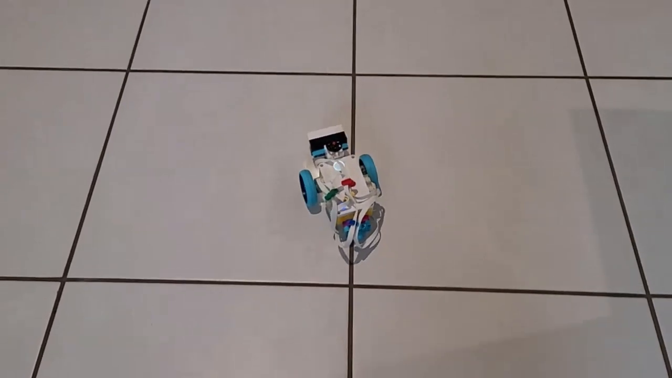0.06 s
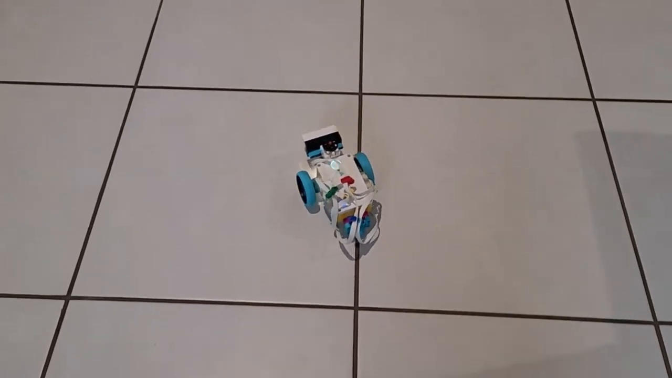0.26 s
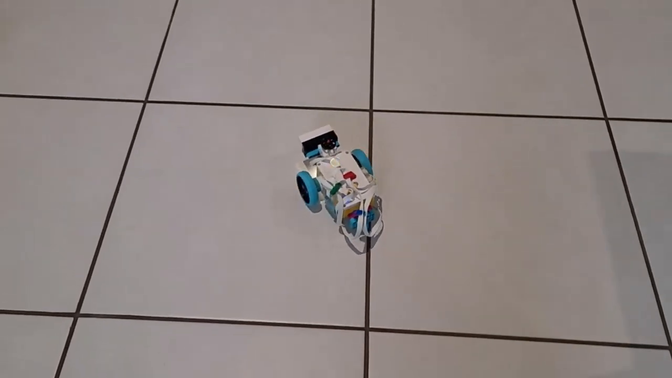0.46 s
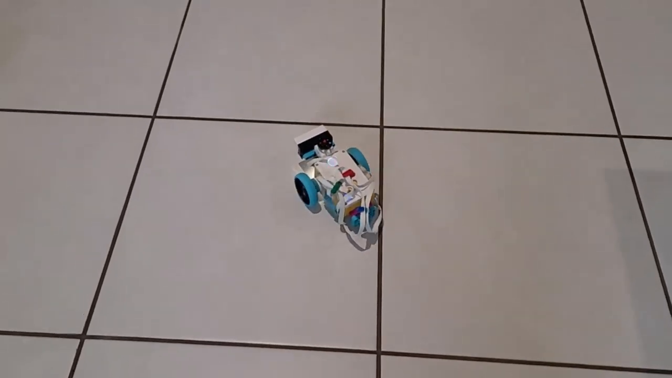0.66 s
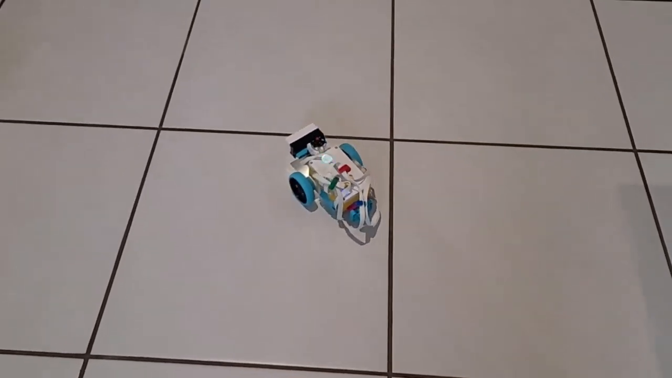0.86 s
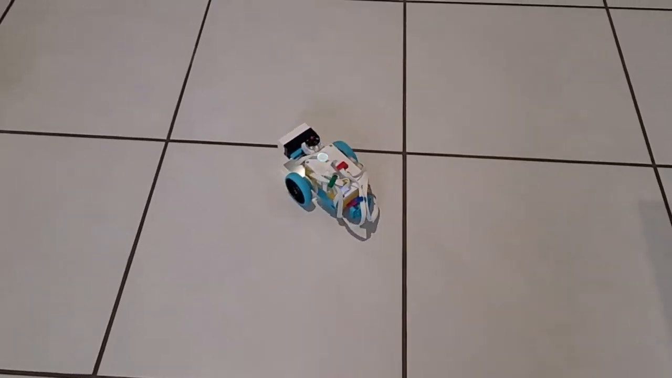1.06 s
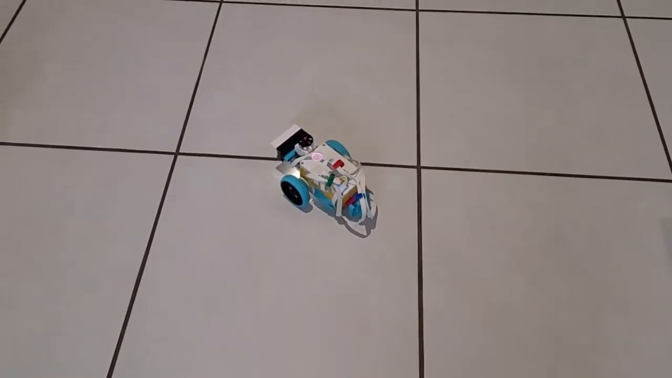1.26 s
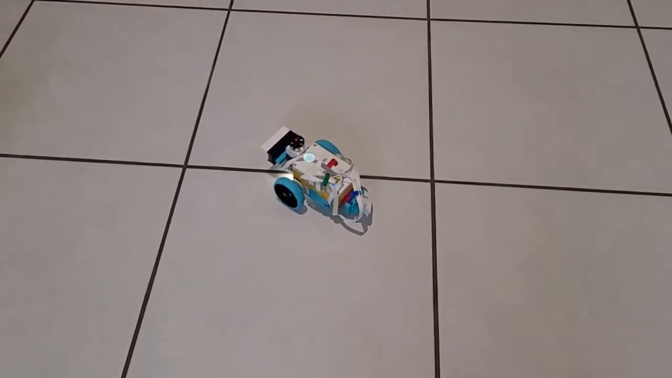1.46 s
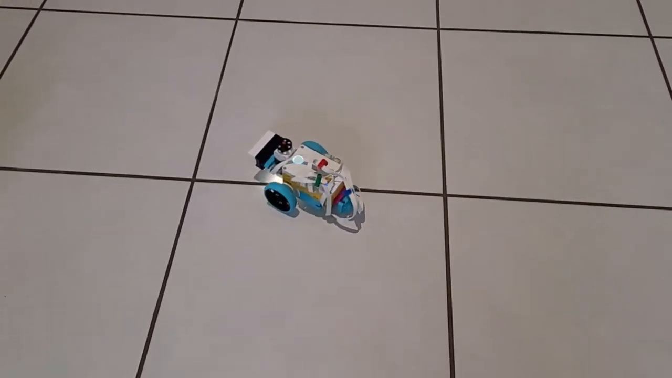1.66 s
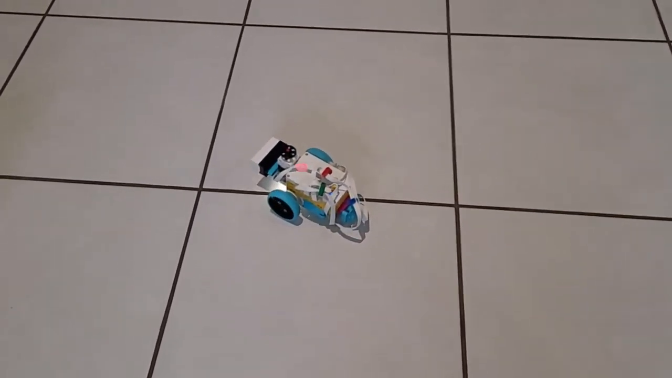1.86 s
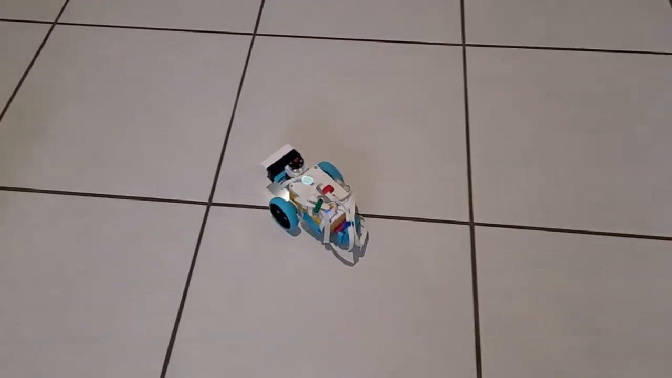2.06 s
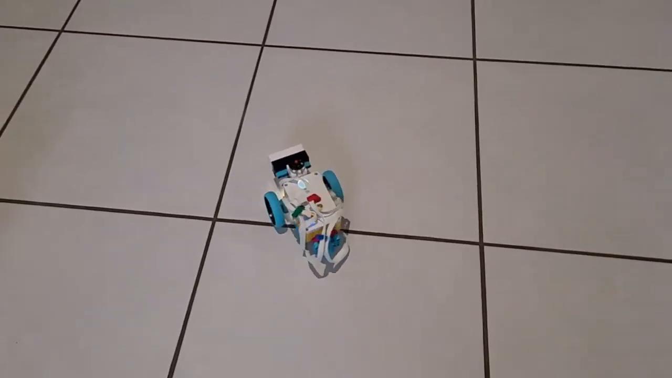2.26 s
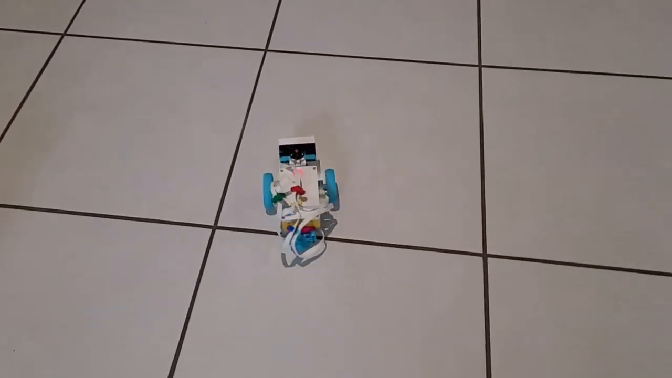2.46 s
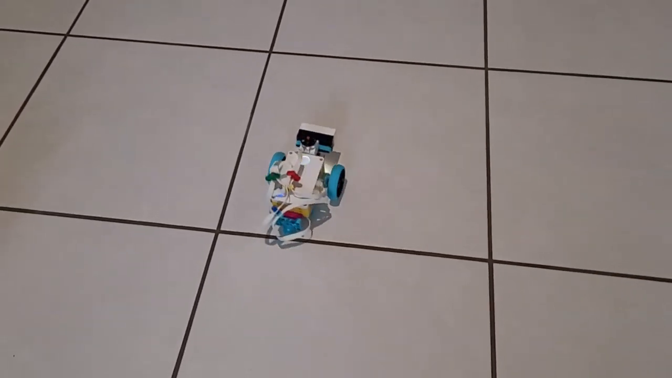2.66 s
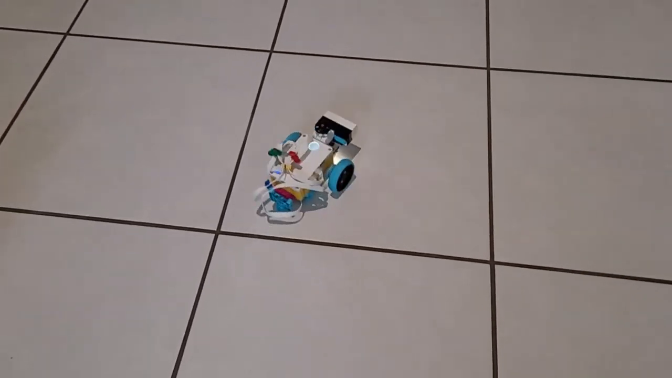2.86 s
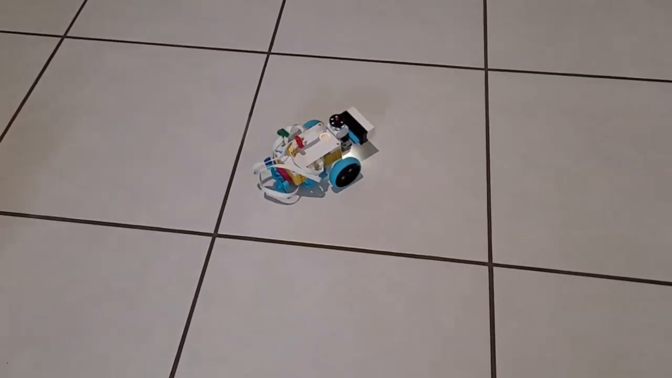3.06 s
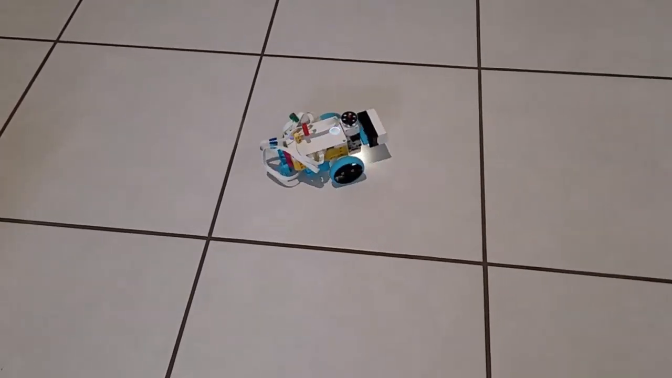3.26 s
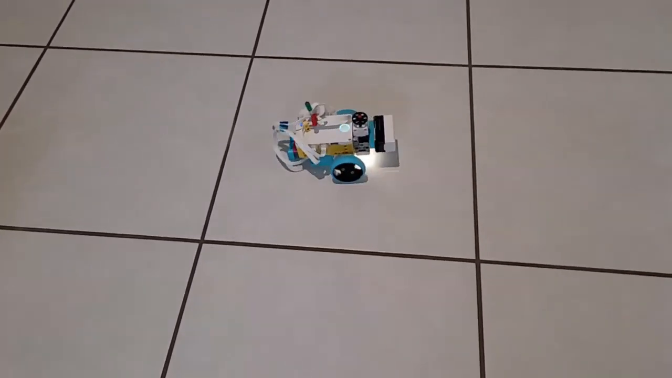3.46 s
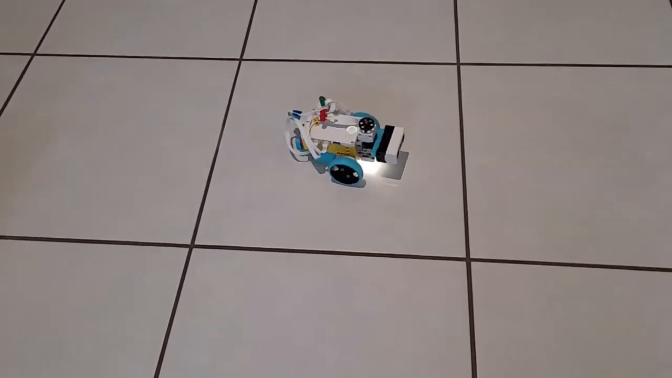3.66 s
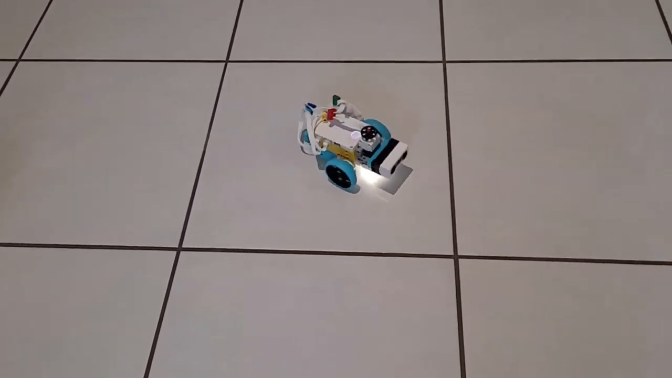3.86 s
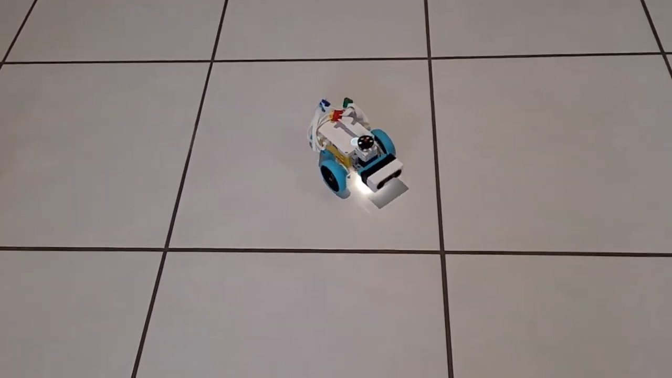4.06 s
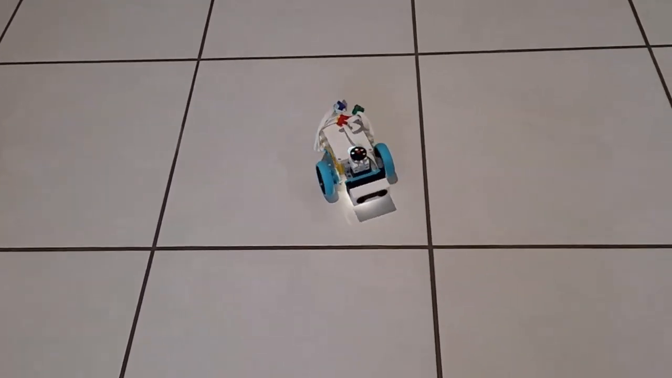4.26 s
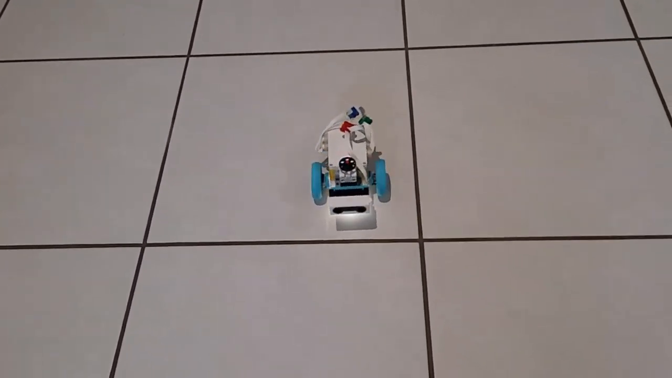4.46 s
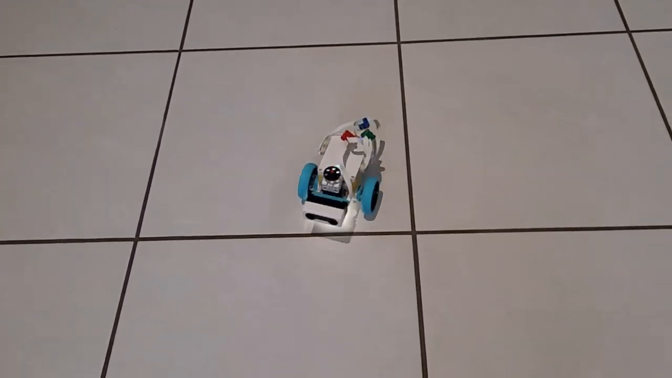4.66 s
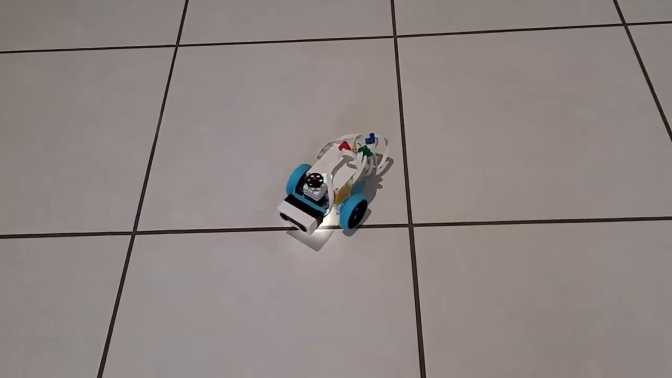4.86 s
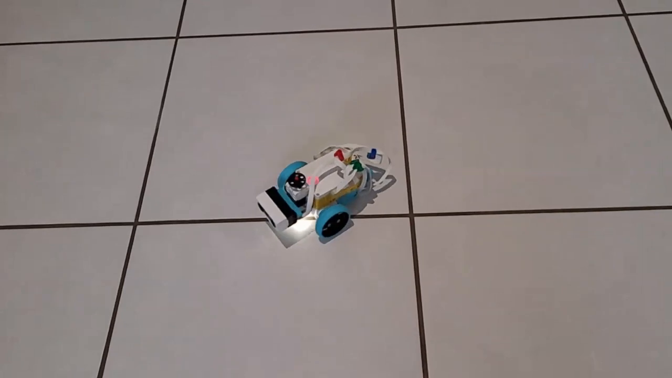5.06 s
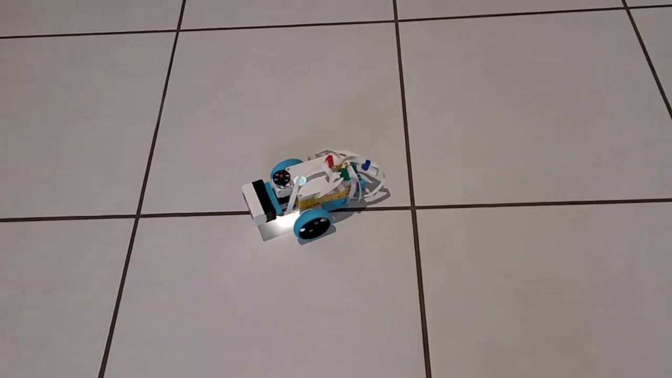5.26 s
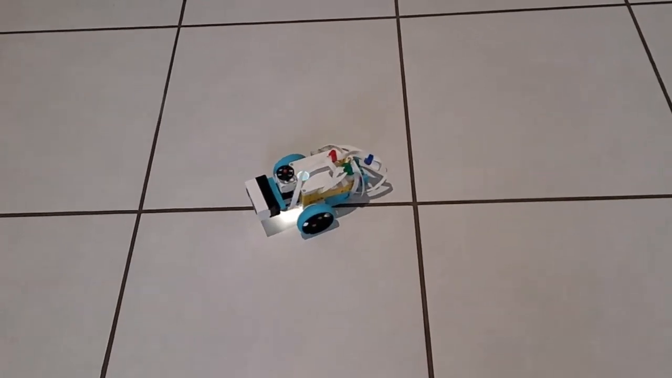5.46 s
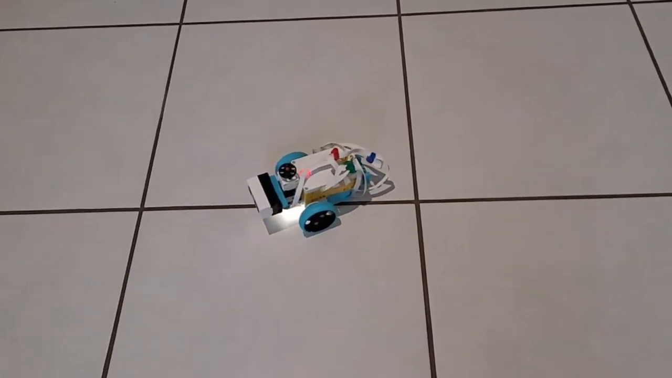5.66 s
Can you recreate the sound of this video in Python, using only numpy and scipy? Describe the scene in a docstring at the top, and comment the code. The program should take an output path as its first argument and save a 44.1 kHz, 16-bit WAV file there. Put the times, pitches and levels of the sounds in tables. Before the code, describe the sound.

Small electric motors whirr, their plastic gears rattling over a thin, steady whine, as a toy robot rolls on tile. The whirr breaks off briefly with one sharp click, resumes for a longer stretch with a quick clatter at a joint, and ends in a lighter click. The bare room rings a little around it. Two dull, dry bumps sound right at the microphone at the end.

```python
"""A whirring, rattling toy robot drives over a tiled floor in a hard, ringing room.
Two small geared motors rattle their teeth in plastic housings, brushes fizz, and the pulsed supply
whines. The robot brakes with a sharp click of gear slack, sets off in a turn, jolts over a joint
and stops. Two soft bumps follow at the microphone, over a faint rumble and hiss."""
import sys
import numpy as np
from scipy import signal
from scipy.fft import rfft, irfft
from scipy.io import wavfile

SR = 44100
rng = np.random.default_rng(int(sys.argv[2]) if len(sys.argv) > 2 else 0)


def waveform_to_disk(signal):
    """Save audio, clipped to [-1, 1], as 16-bit WAV at the path in sys.argv[1]."""
    frames = np.transpose(np.atleast_2d(signal))
    scaled = np.clip(frames, -1, 1) * 32767
    samples = np.round(scaled).astype(np.int16)
    wavfile.write(sys.argv[1], SR, samples)


N = 251811
T = np.arange(N) / SR
SPIN_UP_S, BRAKE_S = .2, .125
SUPPLY_HZ = 1200

# The straight run, then the turn, with the balance of the parts:
# on_s, off_s, gear_db, chassis_db, fizz_db, roll_db, whine_db, whine_swell_db_per_s
RUNS = [(-.3, 1.68, -41.9, -47.5, -43, -62, -57, -4.5), (1.87, 5.191, -42, -48.4, -43.3, -64.5, -56.7, 4.1)]
# How hard the motors work: time_s, effort_db
EFFORT = [(0.03, -41), (0.074, -41), (1.66, -41), (2.1, -42), (2.5, -39), (2.81, -43), (3.37, -45),
          (4.53, -45), (5.15, -41), (5.19, -42)]
# Tone of the gearbox, the chassis, and the tyres and caster on tile: frequency_hz, density_db
GEARBOX_TONE = [(900, -39.5), (1550, -14.5), (1820, -9.5), (1920, -7), (2200, -3), (2480, -0.5), (2700, 2),
                (2920, -1), (3150, -8.5), (3450, -19), (4200, -19), (4850, -15), (5250, -30.5),
                (9000, -28.5)]
CHASSIS_TONE = [(120, -39), (270, -29), (400, -32), (560, -28), (850, -23), (980, -2), (1200, 4),
                (1340, 3.5), (1480, -9), (1900, -28.5)]
ROLLING_TONE = [(100, -10.5), (280, -3.5), (420, -7), (600, -6), (720, 3.5), (900, 2), (1500, -9.5),
                (3000, -44)]
# Tone of the brush fizz, driving straight and turning: frequency_hz, density_db
FIZZ_STRAIGHT = [(2120, -44.5), (3600, -8.5), (4140, -10), (4710, -5.5), (5290, -7), (6090, -1),
                 (7630, -11.5), (8260, -6.5), (8940, -13), (9980, -7.5), (10500, -3), (11000, 1.5),
                 (12300, -5), (13800, -15.5), (15500, -22)]
FIZZ_TURNING = [(2120, -41.5), (3600, -8), (4300, -9.5), (4740, -8), (5350, -5), (6200, 1.5), (6920, -5),
                (9050, -11), (11500, -0.5), (12700, -4.5), (15500, -33)]
# Resonances that come and go: peak_s, half_length_s, pitch_hz, glide_hz_per_s, relative_db
RESONANCES = [(.45, .7, 2800, -80, -49), (2.342, .13, 2750, -100, -45), (2.76, .21, 2783, -300, -41),
              (3.8, .5, 2660, -50, -56.5), (4.65, .6, 4810, 30, -54.5), (4.85, .6, 2150, -50, -50),
              (4.8, .6, 1930, -30, -55)]
# First three harmonics of the supply pulses: pitch_hz, relative_db
WHINE_HARMONICS = [(SUPPLY_HZ, -4), (2 * SUPPLY_HZ, 0), (3 * SUPPLY_HZ, -18)]
# Gear slack snapping shut: start_s, level_db, brightness_db, pitch_factor, damping_factor
SNAPS = [(1.8089, -19, -12, 0.95, 1.2), (1.8104, -7.5, -23, 1.005, 1.4), (1.8115, -15.5, 3, 1.0031, 1.6),
         (1.8148, -26, 4, 1.04, 1.6), (5.3203, -22.5, -22, 1.02, 2.1), (5.3362, -45, 3, 1.047, 1.5)]
# Modes of the plastic frame, which each snap scales: base_pitch_hz, relative_db, base_t60_s
FRAME_MODES = [(1330, -20, 0.026), (2791, 2, 0.01197), (2928, -3, 0.032), (3150, -20.5, 0.04013),
               (4080, -14, 0.018837), (4740, -3.5, 0.024), (5560, -12, 0.018), (8182, -15.5, 0.02),
               (11400, -12.5, 0.014), (12157, -13, 0.018)]
# Tone of a snap's crack: frequency_hz, density_db
CRACK_TONE = [(250, -25.5), (700, -3.5), (1350, 6), (2150, -7), (3050, 6.5), (3550, 2), (4200, 7),
              (4700, 6.5), (5050, -5), (5800, 6), (6600, -3), (9300, -12.5), (12200, -9), (13000, -30),
              (15500, -29)]
# Wheels jolting on the tiles and the chassis rocking at each stop: start_s, rattle_db, thump_db
JOLTS = [(.31, -44, -45), (1.181, -38, -51), (1.33, -39, -55), (1.622, -39, -43), (1.655, -42, -44),
         (1.811, -32, -50), (2.09, -39, -47), (2.639, -33.5, -55), (2.6488, -27, -52), (2.657, -28, -52),
         (2.751, -39, -55), (2.814, -35.5, -59), (4.295, -40, -57), (5.334, -42.5, -54)]
# Soft bumps at the microphone: start_s, knock_db, knock_pitch_hz, thud_db
BUMPS = [(5.4917, -38.5, 300, -79.5), (5.5145, -36, 377, -47.5)]
# Ring time of the room: frequency_hz, t60_s
ROOM_DECAY = [(200, 0.54), (1000, 0.65), (3000, 0.73), (6000, 0.84), (9000, 0.56), (14000, 0.64)]
# Early echoes off floor and walls: nominal_delay_s, gain
ECHOES = [(.0032, 0.35), (0.0118, 0.19), (0.0177, 0.0865), (0.0216, 0.15), (0.031, .12), (.047, 0.14)]
# Tone of the room's rumble and hiss: frequency_hz, density_db
RUMBLE_TONE = [(15, -46.5), (27, -22), (34, -9), (47, 3), (65, -3), (105, -3), (170, -16), (260, -11),
               (500, -38)]
HISS_TONE = [(150, -17), (400, -3), (1000, -11), (4000, -31), (15000, -25.5)]


def motors(gear_rub=.45, fizz_rub=.97, settle_db_per_s=.84):
    """Gear teeth ring the gearbox and chassis; brushes add a fine fizz and the wheels a low roll."""
    fast, slow = gear_teeth(per_turn=3), gear_teeth(per_turn=2)
    gearbox = unit(colour(fast + gear_rub * friction(), GEARBOX_TONE))
    chassis = unit(colour(slow + .5 * fast + gear_rub * friction(), CHASSIS_TONE))
    rolling = unit(colour(friction(), ROLLING_TONE))
    brushes = gear_teeth(per_turn=6) + .5 * fast + fizz_rub * friction()
    out = np.zeros(N)
    for run, fizz_tone in zip(RUNS, (FIZZ_STRAIGHT, FIZZ_TURNING)):
        on, off, gear_db, chassis_db, fizz_db, roll_db, *_ = run
        spinning = spin(on, off)
        settling = amp(-settle_db_per_s * (T - on))  # rattle and roll calm down as a run goes on
        fizz = unit(colour(brushes, fizz_tone))
        out += settling * part_gain(gear_db, spinning, per_effort=.6, power=.9) * gearbox
        out += settling * part_gain(chassis_db, spinning, per_effort=.25, power=1) * chassis
        out += settling * part_gain(roll_db, spinning, per_effort=1.7, power=1.5) * rolling
        out += part_gain(fizz_db, spinning, per_effort=.86, power=2.04) * fizz
    return out + resonances(fast)


def gear_teeth(per_turn, uneven_db=2, drift=.012, jitter=.04, lope_db=1):
    """Tooth impacts of two gear trains at different speeds; strong and weak teeth recur each turn."""
    out = np.zeros(N)
    for ratio in (1, .76):
        speed = ratio * shaft_speed() * (1 + drift * wander(6) + jitter * wander(300))
        tooth = np.floor(np.cumsum(speed) * per_turn / SR).astype(int)
        hits = np.flatnonzero(np.diff(tooth) > 0)
        wear = rng.standard_normal(per_turn)[tooth[hits] % per_turn]
        strength = amp(uneven_db * (rng.standard_normal(N)[hits] + .5 * wear))
        out[hits] += strength * rng.choice([-1, 1], N)[hits]
    return unit(out * amp(lope_db * wander(30)))


def friction(flutter_db=2):
    """Sliding noise, fluttering as the shafts turn."""
    return unit(rng.standard_normal(N) * amp(flutter_db * wander(140)))


def resonances(teeth, trim_db=-2, width_hz=130, waver=.004):
    """Narrow bands of the gear noise sing out and fade as the robot swings round."""
    out = np.zeros(N)
    for peak, half, centre_hz, glide, db in RESONANCES:
        hz = centre_hz + glide * np.clip(T - peak, -2 * half, 2 * half)
        hz *= 1 + waver * wander(7.1)
        swell = running() * np.exp(-((T - peak) / half) ** 2)
        ring = resonate(teeth + friction(), hz, width_hz)
        out += swell * amp(db + trim_db) * unit(resonate(ring, hz, width_hz))
    return out


def effort(usual_db=-42):
    """Motor effort in dB above the usual."""
    return np.interp(T, *np.transpose(EFFORT)) - usual_db


def spin(on, off):
    """Rises from 0 to 1 as the motors spin up, and falls back as they brake."""
    return np.clip((T - on) / SPIN_UP_S, 0, 1) * np.clip(1 - (T - off) / BRAKE_S, 0, 1)


def running():
    """The spin over both runs."""
    return sum(spin(on, off) for on, off, *_ in RUNS)


def shaft_speed(usual_hz=116, hz_per_effort_db=1.79, crawl=.3):
    """Turns per second, climbing from a crawl with spin and rising with effort."""
    return (usual_hz + hz_per_effort_db * effort()) * (crawl + (1 - crawl) * running())


def part_gain(db, spinning, per_effort, power):
    """A moving part gets louder with effort and with a power of the spin."""
    return amp(db + per_effort * effort()) * spinning ** power


def supply_whine(waver_db=1.5, ripple=.15, ripple_hz=52, octave_lead=.6, hold_s=.06, fade_db_per_s=260.5):
    """Supply pulses make the windings sing until just past switch-off; the rotor ripples the level."""
    rotor_hz = ripple_hz * (1 + .053 * wander(4))
    rotor = 1 + ripple * np.cos(2 * np.pi * np.cumsum(rotor_hz) / SR)
    root, octave, twelfth = [
        amp(db + waver_db * wander(7.2)) * np.sin(2 * np.pi * hz * T + .5 * wander(7.1))
        for hz, db in WHINE_HARMONICS]
    out = np.zeros(N)
    for on, off, *_, db, swell in RUNS:
        attack = np.clip((T - on) / SPIN_UP_S, 0, 1)
        load_db = swell * (np.clip(T, on, off) - on)
        fade_db = fade_db_per_s * np.maximum(T - off - hold_s, 0)
        lead = amp(octave_lead * (load_db - swell * (off - on) / 2))  # the octave swells and sinks most
        out += attack * amp(db + load_db - fade_db) * (octave + (root + twelfth) / lead)
    return rotor * out


def gear_snaps(rise_s=.0008, crack_db=-3, crack_decay_s=.0021, rattle_db=-21.5, rattle_decay_s=.066):
    """Gear slack snaps shut: it cracks, rings the frame and leaves loose parts chattering."""
    out, t = np.zeros(N), T[:SR // 3]
    contact = amp(crack_db) * np.exp(-t / crack_decay_s) + amp(rattle_db) * np.exp(-t / rattle_decay_s)
    attack = 1 - np.exp(-t / rise_s)
    for start, db, bright_db, pitch, damping in SNAPS:
        ring = np.zeros(len(t))
        for hz, mode_db, t60 in FRAME_MODES:
            envelope = amp(mode_db + bright_db * (hz > 3500) - 60 * damping * t / t60)
            ring += envelope * np.sin(2 * np.pi * hz * pitch * t)
        crack = colour(rng.standard_normal(len(t)) * contact, CRACK_TONE)
        add(out, start, amp(db) * (attack * ring + amp(bright_db) * crack))
    return out


def floor_jolts(decay_s=.0036, gear_share=.53):
    """Uneven tiles and sudden stops shake the chassis and gearbox, and thump the wheels."""
    shake, thump, t = np.zeros(N), np.zeros(N), T[:SR // 30]
    for start, rattle_db, thump_db in JOLTS:
        contact = rng.standard_normal(len(t)) * np.exp(-t / decay_s)
        add(shake, start, amp(rattle_db) * contact)
        add(thump, start, amp(thump_db) * contact)
    rattle = colour(shake, CHASSIS_TONE) + gear_share * colour(shake, GEARBOX_TONE)
    return rattle + colour(thump, ROLLING_TONE)


def soft_bumps(knock_decay_s=.0017, tap_hz=700, tap_decay_s=.001154, thud_hz=60, thud_decay_s=.033):
    """A dull knock, a tiny tap and a low thud, dry and right at the microphone."""
    out, t = np.zeros(N), T[:SR // 5]
    attack = 1 - np.exp(-t / .00027)
    tap = .85 * np.sin(2 * np.pi * tap_hz * t) * np.exp(-t / tap_decay_s)
    thud = np.sin(2 * np.pi * thud_hz * t) * np.exp(-t / thud_decay_s)
    for start, knock_db, hz, thud_db in BUMPS:
        knock = np.sin(2 * np.pi * hz * t) * np.exp(-t / knock_decay_s)
        add(out, start, attack * (amp(knock_db) * (knock + tap) + amp(thud_db) * thud))
    return out


def moving_reverb(x, tail_db, spots=16):
    """As the robot travels, its sound crossfades from the echoes of one spot to those of the next."""
    position = np.linspace(0, spots - 1, N)
    fades = (np.cos(np.pi / 2 * np.clip(position - spot, -1, 1)) for spot in range(spots))
    return sum(reverb(x * fade, tail_db) for fade in fades)


def reverb(x, tail_db, build_s=.0061):
    """The hard room answers one spot on the floor with scattered early echoes and a bright tail."""
    hz, t, noise = signal.stft(rng.standard_normal(SR), SR, nperseg=256)
    decay = amp(-60 * t / value_at(ROOM_DECAY, hz)[:, None])
    tail = signal.istft(noise * decay, SR, nperseg=256)[1]
    tail *= np.clip(T[:len(tail)] / build_s, 0, 1) ** 2
    response = amp(tail_db) * tail / np.linalg.norm(tail)
    for delay, gain in ECHOES:
        response[round(delay * rng.uniform(.85, 1.15) * SR)] += gain
    return signal.fftconvolve(x, response)[:N]


def room_tone(rumble_db=-64, hiss_db=-72):
    """A bed of low rumble and faint hiss."""
    rumble = unit(colour(rng.standard_normal(N), RUMBLE_TONE, size=16384))
    hiss = unit(colour(rng.standard_normal(N), HISS_TONE))
    return amp(rumble_db) * rumble + amp(hiss_db) * hiss


def colour(x, tone, size=4096):
    """Minimum-phase filter of unit energy: each impulse rings with the given tone."""
    log_gain = np.log(amp(value_at(tone, abs(np.fft.fftfreq(size, 1 / SR)))))
    ring = np.fft.ifft(np.exp(signal.hilbert(log_gain).conj())).real[:size // 2]
    return signal.fftconvolve(x, ring / np.linalg.norm(ring))[:len(x)]


def resonate(x, hz, width_hz):
    """A resonance that follows the pitch curve hz."""
    carrier = np.exp(2j * np.pi * np.cumsum(hz) / SR)
    pole = np.exp(-np.pi * width_hz / SR)
    return (carrier * signal.lfilter([1 - pole], [1, -pole], x / carrier)).real


def wander(rate_hz):
    """Smooth random drift of rms 1."""
    hz = np.fft.rfftfreq(N, 1 / SR)
    return unit(irfft(rfft(rng.standard_normal(N)) * np.exp(-(hz / rate_hz) ** 2), N))


def value_at(table, hz):
    """Interpolates a table on a log-frequency axis."""
    table_hz, values = np.transpose(table)
    return np.interp(np.log(hz + 1), np.log(table_hz + 1), values)


def add(mix, start_s, sound):
    """Drops a sound into the mix."""
    part = mix[round(start_s * SR):][:len(sound)]
    part += sound[:len(part)]


def amp(db):
    """Decibels to gain."""
    return 10 ** (np.asarray(db) / 20)


def unit(x):
    """Scales to rms 1."""
    return x / np.sqrt(np.mean(x ** 2) + 1e-20)


def scene(motors_db=-1):
    """The robot in its room, the same in both channels."""
    drive = amp(motors_db) * motors() + floor_jolts()
    snaps = gear_snaps()
    echoes = moving_reverb(drive, tail_db=-3) + reverb(snaps, tail_db=-5)
    robot = drive + snaps + echoes + supply_whine()
    return np.tile(robot + soft_bumps() + room_tone(), (2, 1))


def record(dry, cutoff_hz=15700):
    """A steep low-pass takes off the very top."""
    lowpass = signal.firwin(1023, cutoff_hz, window=("kaiser", 9), fs=SR)
    return signal.oaconvolve(dry, lowpass[None], "same")


dry = scene()
out = record(dry)
waveform_to_disk(out)
```